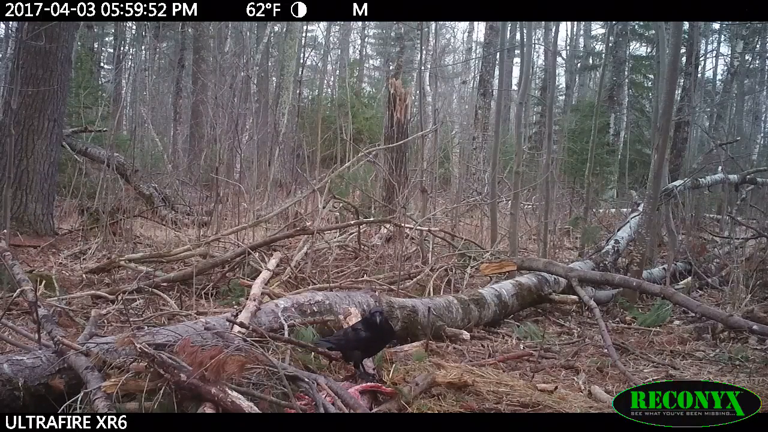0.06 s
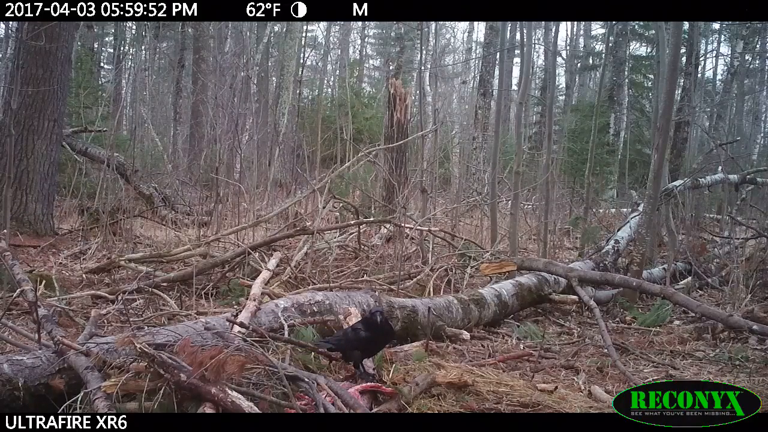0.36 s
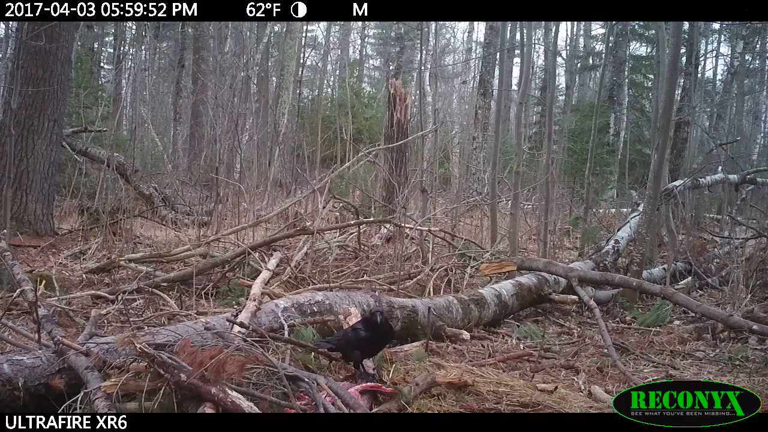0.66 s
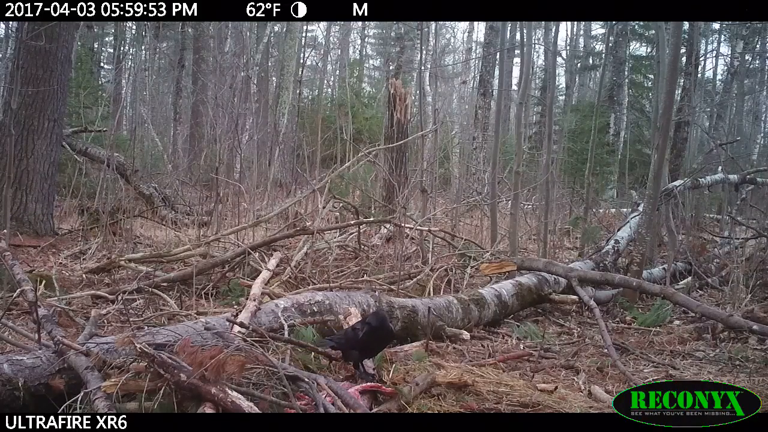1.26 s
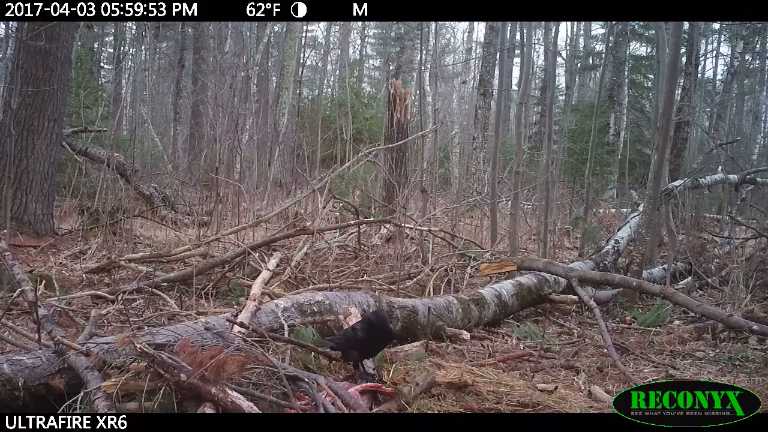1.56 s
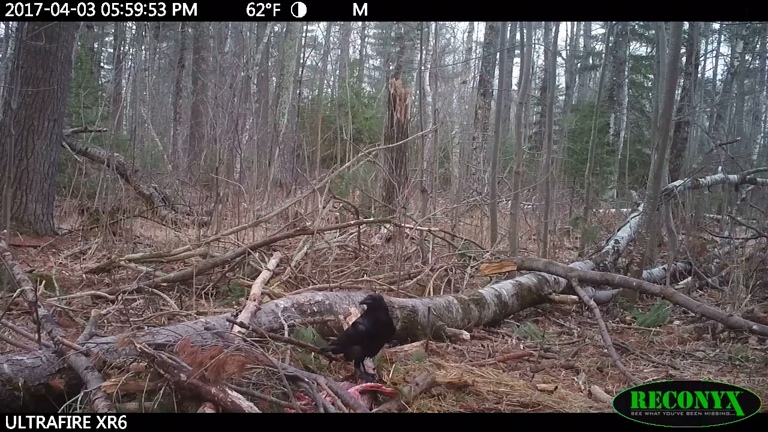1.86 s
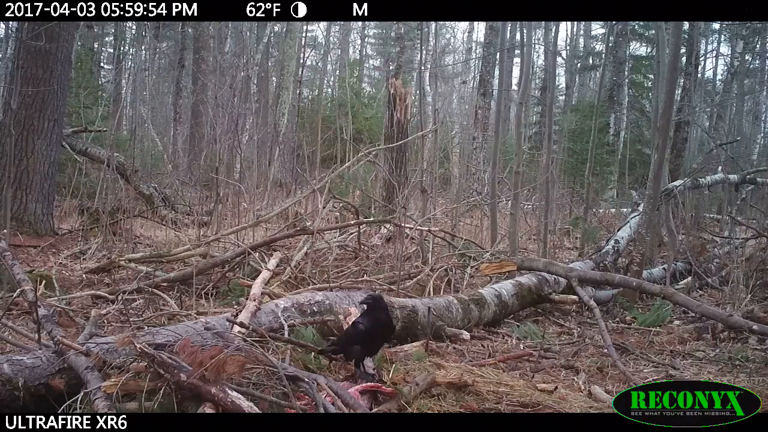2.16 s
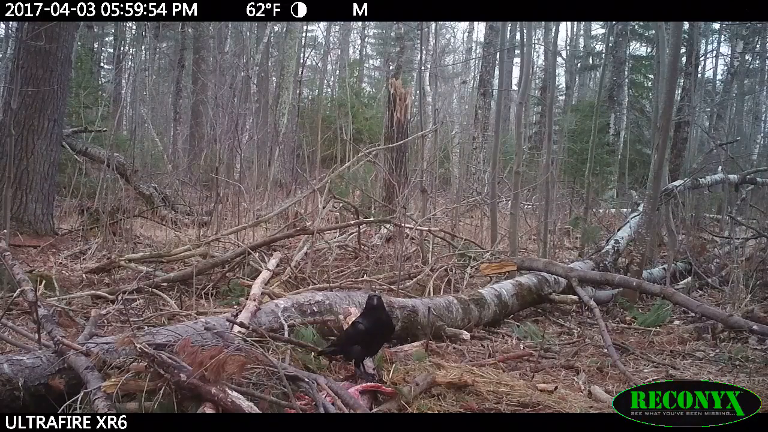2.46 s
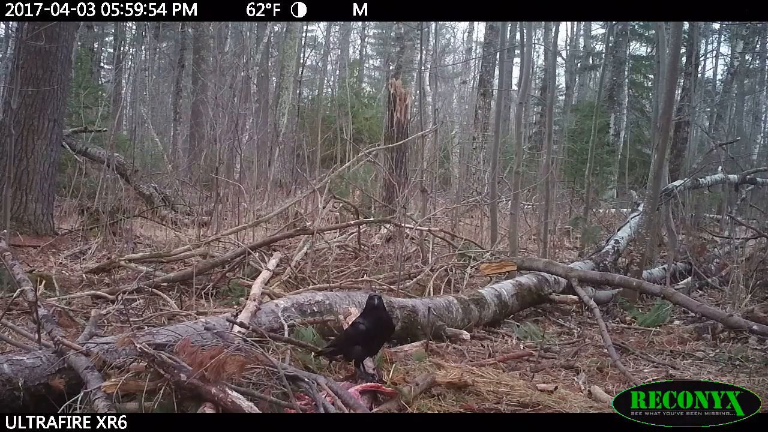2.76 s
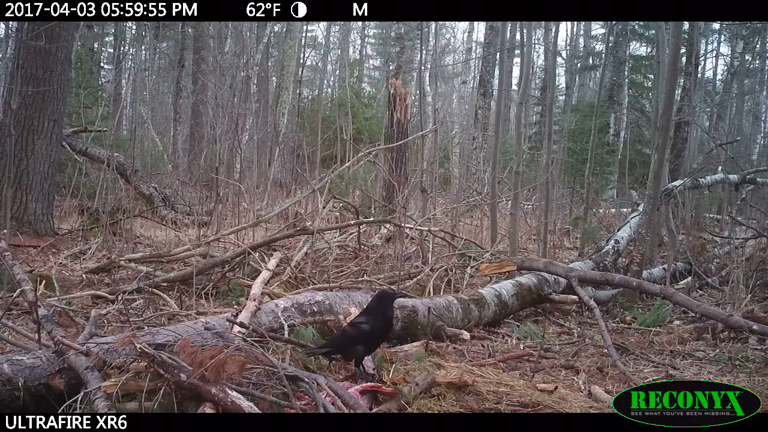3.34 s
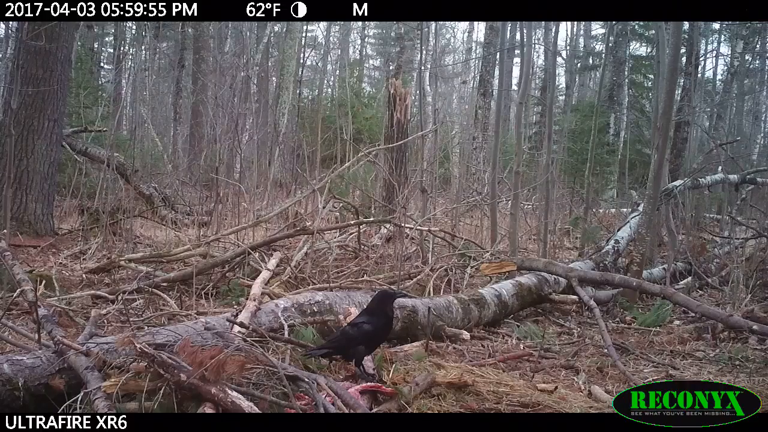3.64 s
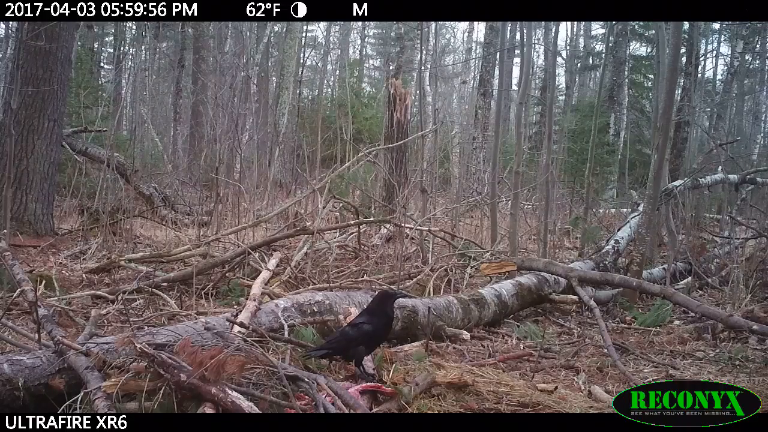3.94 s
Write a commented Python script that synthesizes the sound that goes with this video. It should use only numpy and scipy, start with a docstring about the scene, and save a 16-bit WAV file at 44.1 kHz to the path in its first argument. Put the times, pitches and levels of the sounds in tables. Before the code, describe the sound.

Dry leaves crackle and twigs snap as a big bird pulls at remains in quiet woods.

```python
"""Dry leaves and needles crackle as a large black bird tugs at remains on a woodland floor.
Twigs snap and the soft ground thuds as it straightens up, then it shuffles softly.
Ground and trunks scatter the sound on its way to two microphone ports a few metres off.
Behind it lie a faint distant drone, low rumble and steady hiss."""
import sys
import numpy as np
from scipy import signal
from scipy.fft import rfft, irfft
from scipy.io import wavfile

SR = 44100
rng = np.random.default_rng(int(sys.argv[2]) if len(sys.argv) > 2 else 0)


def generate_wav(signal):
    """Clip the signal to [-1, 1] and save it as 16-bit WAV at the path in sys.argv[1]."""
    frames = np.transpose(np.atleast_2d(signal))
    scaled = np.clip(frames, -1, 1) * 32767
    pcm = np.round(scaled).astype(np.int16)
    wavfile.write(sys.argv[1], SR, pcm)


N = 176400

# background spectrum (frequency [Hz], relative density [dB])
AIR_SPECTRUM = [(8, 22), (18, 22.5), (25, 27), (38, 17.5), (62, 18), (90, 10), (130, 6), (250, 1.5),
                (500, -.7), (1000, -4), (2200, -6.5), (4000, -7.5), (6500, -7.5), (9000, -9.5),
                (15000, -11)]
# background left-right likeness (frequency [Hz], correlation [0..1])
AIR_CORRELATION = [(20, 0.52), (60, 0.8), (150, 0.74), (400, 0.43), (1200, 0.555), (2400, 0.43),
                   (4500, 0.16), (15000, 0.28)]
# distant tones (frequency [Hz], level [dB], width [Hz])
DRONE_TONES = [(59.4, -64, 1.5), (70.76, -59.5, 1.9), (109.53, -70.5, 1.35), (183.2, -76.5, 1.9)]
# left port response (frequency [Hz], gain [dB])
LEFT_PORT_EQ = [(200, 1), (3000, 0), (5500, -3), (7000, -4.5), (9500, -6.5), (15000, -5)]
# weight shifts on soft ground (time [s], level [dB])
THUD_EVENTS = [(1.453, -54), (1.48, -52)]
# ground thud (frequency [Hz], gain [dB])
THUD_SPECTRUM = [(30, -17), (80, 3), (250, -4), (600, -12.5), (1500, -34), (5000, -60)]
# twigs and fibres breaking (time [s], level [dB])
SNAP_EVENTS = [(1.128, -42), (1.170, -46), (1.3040, -35), (1.3225, -31), (1.338, -36), (1.366, -29),
               (1.3761, -25), (1.4063, -33), (1.4670, -18), (1.4812, -15.5), (1.4870, -41), (1.4881, -24.5),
               (1.579, -32), (1.5872, -38), (1.6049, -30), (1.7507, -45), (1.7738, -36), (1.7870, -40),
               (1.8356, -31), (1.9580, -34), (2.0180, -37), (2.978, -46), (3.055, -44)]
# twig snap (frequency [Hz], gain [dB])
SNAP_SPECTRUM = [(300, -29), (1500, -23), (3600, -18), (5200, -8), (6500, -4), (8000, 3.5), (10500, 1),
                 (13000, -8.5), (15500, -8)]
# pulls and shuffles in the litter
# (start [s], rise [s], hold [s], release [s/20 dB], level [dB], tilt [dB/octave], centre [Hz])
RUSTLE_EVENTS = [(-.02, 0.012, 0.036, 0.05, -52, -1.5, 6300), (.14, .022, 0.022, .12, -48.5, -0.5, 5650),
                 (.36, .1, 0.036, 0.1, -60, -1, 6300), (0.698, .16, 0.0325, 0.37, -58, -2, 6240),
                 (0.984, 0.015, .025, 0.16, -53.8, -2, 6000), (1.24, .025, .035, .1, -51, 3.5, 6400),
                 (1.292, .03, .055, 0.13, -44.2, -0.5, 6420),
                 (1.399, 0.0044, 0.0084, .15, -46.5, -1.5, 6360),
                 (1.45, 0.0273, 0.0087, .09, -42.5, 1.5, 6840), (1.564, 0.02, .066, 0.15, -44, 0, 6400),
                 (1.71, 0.039, 0.16, 0.1349, -54, 0, 6400), (1.932, 0.0255, 0.021, .1, -47, -.3, 6400),
                 (2.01, 0.0091, .02, 0.41, -59.5, -2, 6400), (2.244, .025, .02, 0.08, -52.5, -.5, 6400),
                 (2.335, 0.009, 0.0167, 0.4, -61.5, 2, 6400), (2.58, 0.033, 0.033, 0.04, -50, -.5, 6400),
                 (2.829, 0.12, 0.02, 0.2, -52.5, 1.5, 6300), (3.265, 0.0533, .03, 0.0654, -53, 0, 6200),
                 (3.661, 0.0407, .013, 0.06, -50, 0, 6160)]
# dry litter (frequency [Hz], gain [dB])
RUSTLE_SPECTRUM = [(200, -23), (1000, -20.5), (2200, -15.5), (3500, -13.5), (4400, -8), (5300, -6),
                   (6400, 0), (7600, -3), (9000, -9), (12000, -16.5), (15000, -24)]


def amp(db):
    """Decibels to gain."""
    return 10 ** (np.asarray(db) / 20)


def unit_rms(x):
    """Scale to rms 1."""
    return x / np.sqrt(np.mean(x ** 2) + 1e-20)


def lookup(table, hz):
    """Interpolate on a log-frequency axis."""
    table_hz, values = np.transpose(table)
    return np.interp(np.log(hz + 1), np.log(table_hz + 1), values)


def bins_hz():
    """Bin frequencies of an N-point spectrum."""
    return np.fft.rfftfreq(N, 1 / SR)


def add(mix, start_s, sound):
    """Mix a sound in at start_s."""
    part = mix[round(start_s * SR):][:len(sound)]
    part += sound[:len(part)]


def wander(cutoff_hz):
    """Low-passed noise, rms 1."""
    return unit_rms(irfft(rfft(rng.standard_normal(N)) / (1 + (bins_hz() / cutoff_hz) ** 4), N))


def colour(x, spectrum, tilt_db_per_oct=0, size=1024):
    """Minimum-phase filter of unit energy; the tilt acts above SR / 20."""
    hz = abs(np.fft.fftfreq(size, 1 / SR))
    octaves = np.log2(np.maximum(hz, SR / 20) / SR)
    log_gain = np.log(amp(lookup(spectrum, hz) + tilt_db_per_oct * octaves))
    taps = np.fft.ifft(np.exp(np.conj(signal.hilbert(log_gain)))).real
    return signal.fftconvolve(x, taps / np.linalg.norm(taps))[:len(x)]


def air(level_db=-47.5, waver_db=0.45, waver_hz=2.4):
    """Rumble largely common to both ports, thinning into mostly unrelated hiss."""
    hz = bins_hz()
    left, independent = rfft(rng.standard_normal((2, N)))
    correlation = lookup(AIR_CORRELATION, hz)
    right = correlation * left + np.sqrt(1 - correlation ** 2) * independent
    pair = irfft(np.array([left, right]) * amp(lookup(AIR_SPECTRUM, hz)), N)
    return unit_rms(pair) * amp(level_db + waver_db * wander(waver_hz))


def drone():
    """Low wavering tones, as of far traffic."""
    t, out = np.arange(N) / SR, np.zeros(N)
    for hz, db, width_hz in DRONE_TONES:
        envelope = wander(width_hz) + 1j * wander(width_hz)
        out += amp(db) * unit_rms((envelope * np.exp(2j * np.pi * hz * t)).real)
    return out


def scatter(x, t60_s, fade_hz=9):
    """Small reflections, different at each port; four path sets crossfade steadily to sound diffuse."""
    t, out = np.arange(SR // 2) / SR, np.zeros((2, N))
    for phase in np.pi * np.arange(4) / 4:
        taps = rng.standard_normal((2, len(t))) * amp(-60 * t / t60_s)
        taps /= np.linalg.norm(taps, axis=1, keepdims=True)
        fade = np.cos(np.pi * fade_hz * np.arange(N) / SR + phase) ** 2 / np.sqrt(3 / 2)
        out += signal.fftconvolve((x * fade)[None], taps, axes=1)[:, :N]
    return out


def woodland(x, right_lag_s=0.0001):
    """Direct sound plus ground and trunk scatter; the left port gets less treble."""
    hz = bins_hz()
    delayed = irfft(rfft(x) * np.exp(-2j * np.pi * hz * right_lag_s), N)
    ground = amp(-6) * scatter(x, t60_s=0.041)
    trunks = amp(-9) * scatter(x, t60_s=0.65)
    left, right = np.array([x, delayed]) + ground + trunks
    shaded_left = irfft(rfft(left) * amp(lookup(LEFT_PORT_EQ, hz)), N)
    return np.array([shaded_left, right])


def thuds(decay_s=0.014):
    """Soft ground gives dully under the bird's weight."""
    t, out = np.arange(SR // 5) / SR, np.zeros(N)
    for start_s, db in THUD_EVENTS:
        burst = rng.standard_normal(len(t)) * np.exp(-t / decay_s)
        add(out, start_s, amp(db) * colour(burst, THUD_SPECTRUM, size=4096))
    return out


def snaps(rise_s=0.00036, decay_s=0.00034, trim_db=-3.5):
    """Each twig breaks in a bright burst of about 1 ms."""
    t, out = np.arange(SR // 20) / SR, np.zeros(N)
    envelope = np.minimum(t / rise_s, 1) * np.exp(-np.maximum(t - rise_s, 0) / decay_s)
    for start_s, db in SNAP_EVENTS:
        crack = colour(envelope * rng.standard_normal(len(t)), SNAP_SPECTRUM)
        crack *= np.linalg.norm(envelope) / np.linalg.norm(crack)
        add(out, start_s, amp(db + trim_db) * crack)
    return out


def rustles(grains_per_s=1800, spread_db=3.5, brush_share=0.44, clump_db=1.0, clump_hz=90):
    """Each movement crushes clumps of tiny dry grains over a soft brushing."""
    t, out = np.arange(N) / SR, np.zeros(N)
    sizes = amp(spread_db * np.minimum(rng.exponential(1, N), 4)) * rng.choice([-1, 1], N)
    grains = unit_rms(sizes * (rng.random(N) < grains_per_s / SR))
    texture = np.sqrt(1 - brush_share) * grains + np.sqrt(brush_share) * rng.standard_normal(N)
    crackle = unit_rms(texture * amp(clump_db * wander(clump_hz)))
    for start_s, rise_s, hold_s, release_s, db, tilt_db_per_oct, centre_hz in RUSTLE_EVENTS:
        # move the 6400 Hz peak to centre_hz
        spectrum = [(hz * centre_hz / 6400, gain_db) for hz, gain_db in RUSTLE_SPECTRUM]
        attack = np.clip((t - start_s) / rise_s, 0, 1)
        fall_db = 20 * np.maximum(t - start_s - rise_s - hold_s, 0) / release_s
        pull = crackle * attack * amp(db - fall_db)
        first = max(round(start_s * SR), 0)
        add(out, first / SR, colour(pull[first:first + SR], spectrum, tilt_db_per_oct))
    return out


def scene():
    """The bird in the litter over the quiet of the wood."""
    return woodland(rustles() + snaps() + thuds()) + air() + drone()


def record(dry, cutoff_hz=15350, dc_offset=-0.0405):
    """Low-pass and constant offset."""
    lowpass = signal.firwin(511, cutoff_hz, window=("kaiser", 9), fs=SR)
    return signal.oaconvolve(dry, lowpass[None], "same") + dc_offset


dry = scene()
out = record(dry)
generate_wav(out)
```